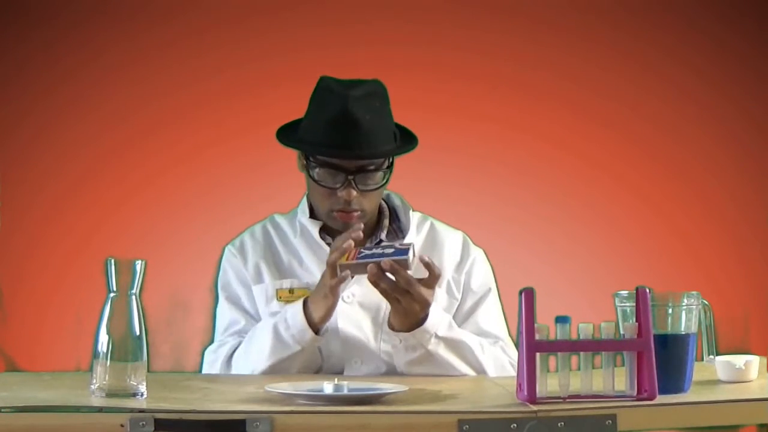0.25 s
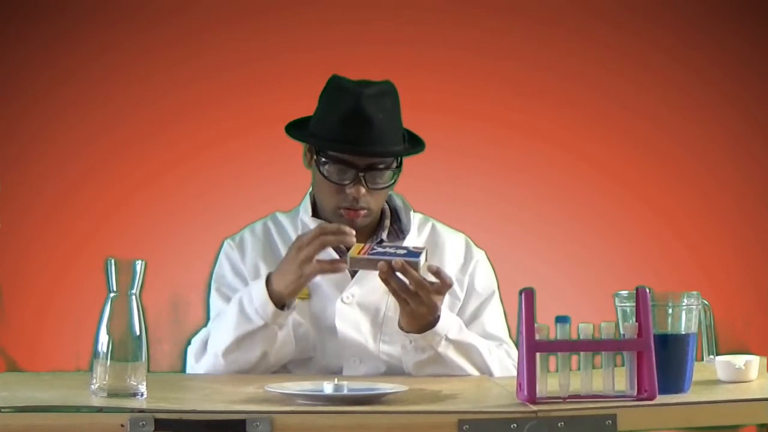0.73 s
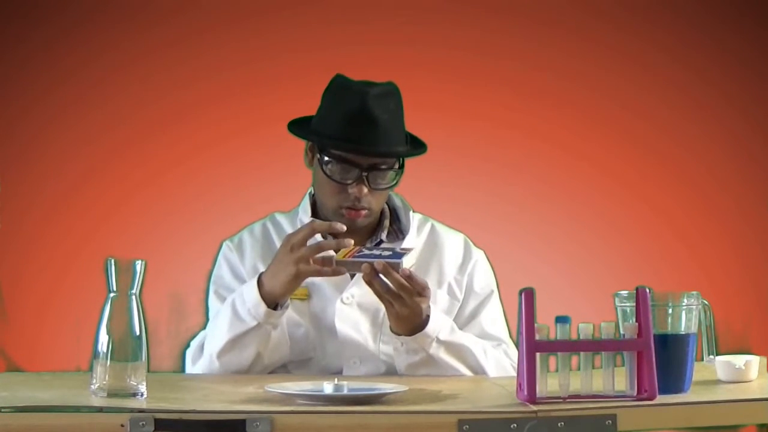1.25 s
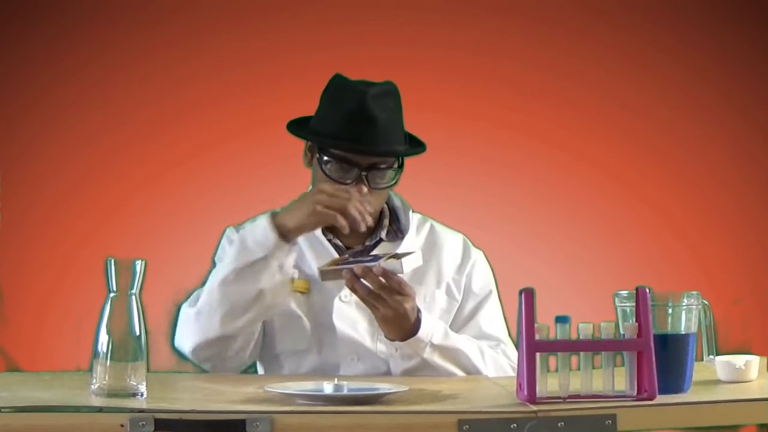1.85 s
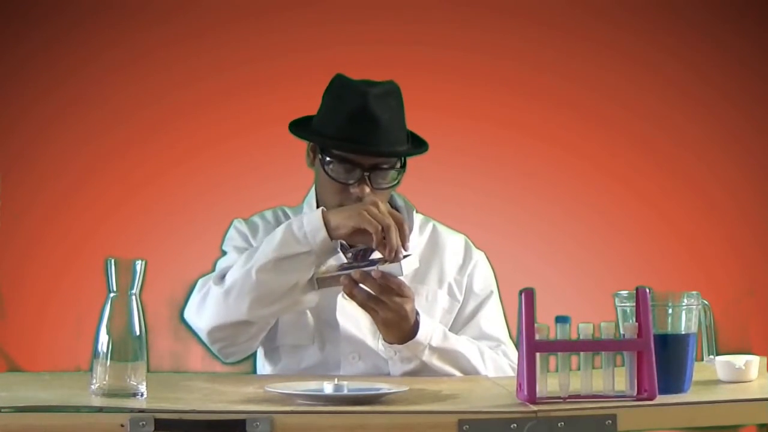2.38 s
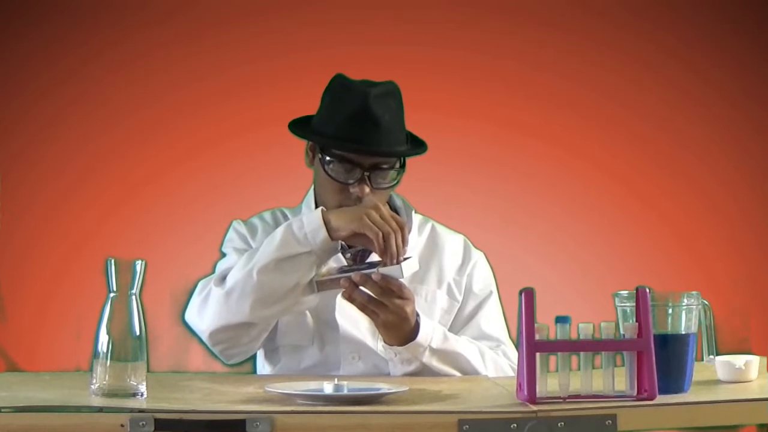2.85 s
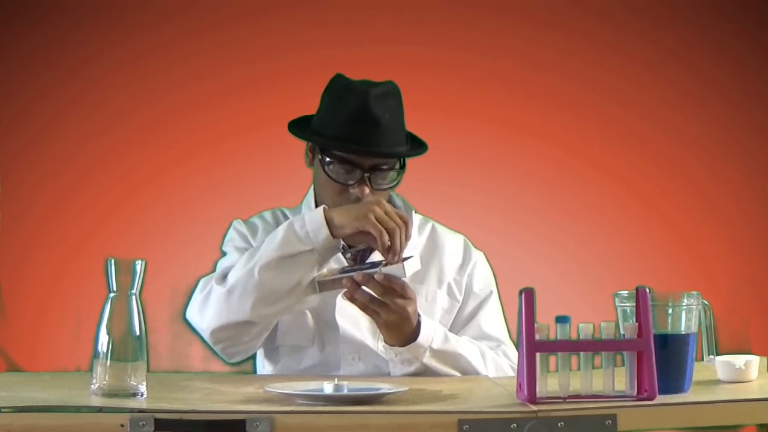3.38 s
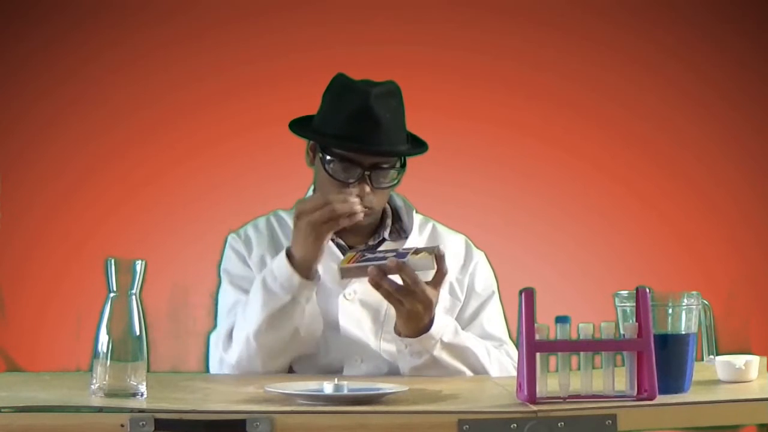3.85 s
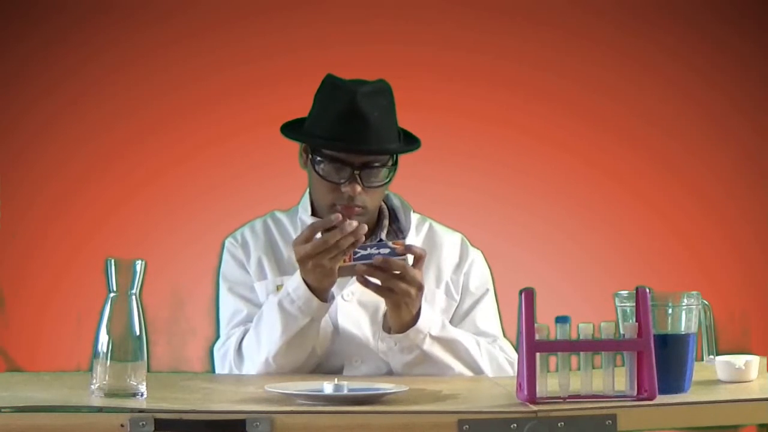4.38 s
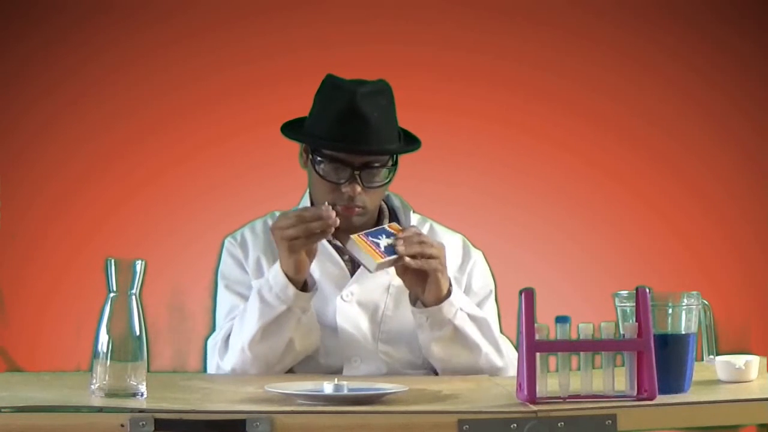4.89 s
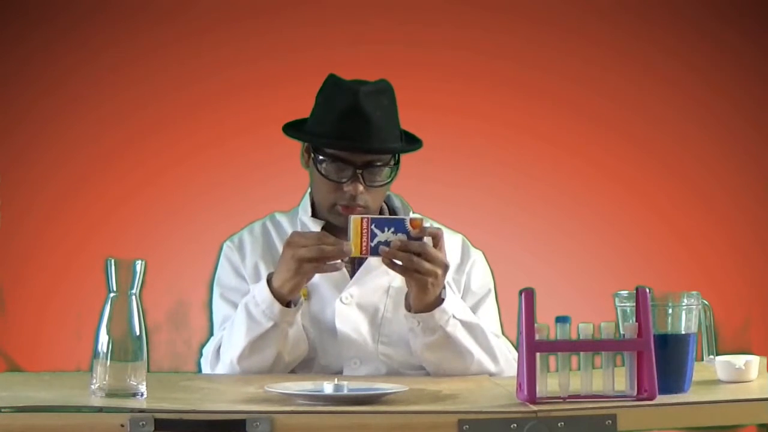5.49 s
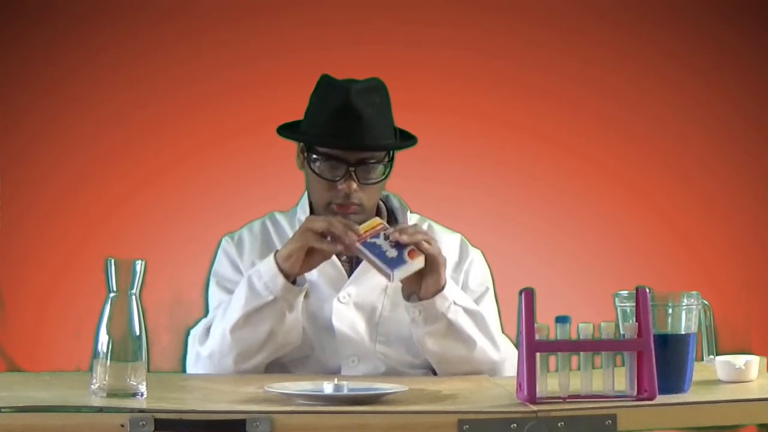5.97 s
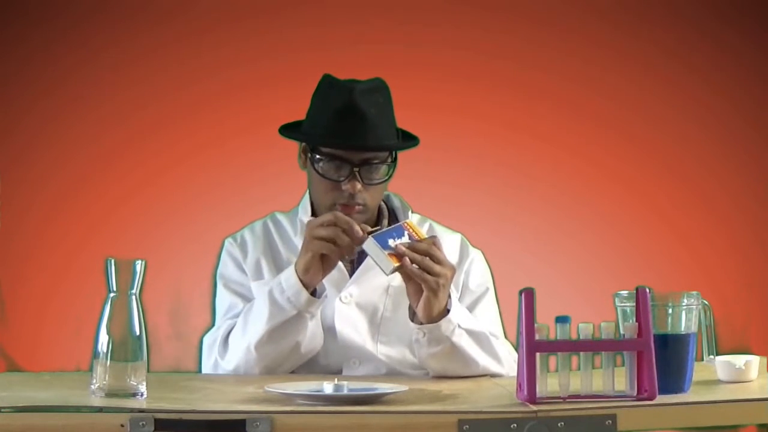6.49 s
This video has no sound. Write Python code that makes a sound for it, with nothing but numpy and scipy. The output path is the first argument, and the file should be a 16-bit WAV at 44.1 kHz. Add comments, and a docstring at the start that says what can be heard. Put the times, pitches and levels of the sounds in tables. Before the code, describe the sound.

A cardboard matchbox is handled a few metres from the microphone in a quiet, bare room, with short reflections and a faint, steady hush throughout. Soft papery rubs open the sound, with a sharp little tap at 0.3 seconds. After faint finger shifting, the tray scrapes in its sleeve around 1.5 seconds and stops with a light, hollow knock at 1.8. From about 2.3 to 3.5 seconds, wooden matches tick and rattle softly as fingers pick among them, with a stronger cluster of clicks near 3.3. Short scrapes at 3.8 and 4.1 seconds lead to a louder slide and clack at 4.3 as the tray shuts. Light taps, rubs and small rattles follow between 5.3 and 5.8 seconds as the box is turned. A few knocks and a firm, dry scrape come at about 6.1 to 6.3 seconds, then faint handling.

```python
"""Handling a matchbox.

A cardboard matchbox is handled a few metres away in a quiet, bare room. The tray slides in its sleeve
by stick and slip, fingers knock the box, and wooden matches tick against each other and rattle.
The table top and the walls answer strongly, over a steady hush."""
import sys
import numpy as np
from scipy import signal
from scipy.fft import rfft, irfft, next_fast_len
from scipy.io import wavfile
from scipy.ndimage import uniform_filter1d

SR = 44100
rng = np.random.default_rng(int(sys.argv[2]) if len(sys.argv) > 2 else 0)


def dump(signal):
    """Clip the signal to [-1, 1] and save it as 16-bit WAV at the path in sys.argv[1]."""
    limited = np.clip(np.atleast_2d(signal).T, -1, 1)
    pcm = np.round(limited * 32767).astype(np.int16)
    wavfile.write(sys.argv[1], SR, pcm)


N = 297053
TOP_HZ = 15850


def amp(db):
    """Decibels to gain."""
    return 10 ** (np.asarray(db) / 20)


def unit_rms(x):
    """Scale to rms 1."""
    return x / np.sqrt(np.mean(x ** 2) + 1e-20)


def log_interp(points, hz):
    """Interpolate (Hz, value) points on a log axis."""
    point_hz, values = np.transpose(points)
    return np.interp(np.log(hz + 1), np.log(point_hz + 1), values)


def curves(times_s, rows):
    """Interpolate each column to one value per sample."""
    return [np.interp(np.arange(N) / SR, times_s, column) for column in rows.T]


def filtered(x, response):
    """Apply a complex frequency response."""
    size = next_fast_len(x.shape[-1] + 8192)
    hz = np.fft.rfftfreq(size, 1 / SR)
    return irfft(rfft(x, size) * response(hz), size)[..., :x.shape[-1]]


def resonate(x, modes):
    """Parallel resonances of alternating sign."""
    return filtered(x, lambda f: sum((-1) ** k * amp(db) * 1j * f * bw / (hz * hz - f * f + 1j * f * bw)
                                     for k, (hz, bw, db) in enumerate(modes)))


def stereo(pair, correlation):
    """Mix two independent signals to a left-right correlation per frequency."""
    angle = lambda hz: np.arccos(np.clip(log_interp(correlation, hz), -1, 1)) / 2
    mid, side = filtered(pair, lambda hz: np.array([np.cos(angle(hz)), np.sin(angle(hz))]))
    return np.array([mid + side, mid - side])


def pings(start_s, db, hz, t60_s, samples):
    """Sum of damped sines, each swelling over about a cycle."""
    t = np.arange(samples) / SR
    cycles = hz[:, None] * t
    decay = amp(db[:, None] - 60 * t / np.reshape(t60_s, (-1, 1)))
    rings = decay * (1 - np.exp(-1.8 * cycles)) * np.sin(2 * np.pi * cycles)
    at = np.round(start_s * SR).astype(int)[:, None] + np.arange(samples)
    return np.bincount(at.ravel(), rings.ravel(), N + samples)[:N]


# Air and hiss. Each row: frequency in Hz, relative density in dB.
HUSH_SPECTRUM = [(12, -43), (25, -20), (50, 1), (80, -6.5), (133, -1.5), (200, -2), (400, -3.5), (700, -5),
                 (1300, -9.5), (2000, -13.5), (3200, -14), (6000, -18.5), (10000, -21.5), (13000, -21.5),
                 (15800, -25.5)]
# Each row: frequency in Hz, left-right correlation.
HUSH_CORRELATION = [(60, 1), (100, 0.91), (180, 0.86), (310, 0.47), (550, 0.18), (950, 0.02), (1650, 0.052),
                    (2860, 0.13), (4970, 0.54), (8640, 1), (15000, 1)]


def hush(level_db=-57, patch_db=0.99):
    """Steady room air and hiss, slightly patchy in time and frequency."""
    bins = signal.stft(rng.standard_normal((2, N + 512)), nperseg=512)[2]
    patches = uniform_filter1d(rng.standard_normal(bins.shape[1:]), 6, axis=0)
    patches = unit_rms(uniform_filter1d(patches, 14, axis=1))
    noise = signal.istft(bins * amp(patch_db * patches), nperseg=512)[1][:, :N]
    air = filtered(noise, lambda hz: amp(log_interp(HUSH_SPECTRUM, hz)))
    return amp(level_db) * unit_rms(stereo(air, HUSH_CORRELATION))


# Each row: time in seconds, body level in dB, treble level in dB.
FINGER_SHIFTS = [(0, -65, -67.5), (.6, -69, -67), (.86, -74, -72.5), (1.2, -69.5, -72.5), (1.95, -69, -68),
                 (2.2, -71.5, -71.5), (2.86, -65.5, -68), (3.1, -68, -69.5), (3.6, -66, -70),
                 (3.75, -72.5, -68.5), (4.07, -67, -65.5), (4.7, -62.5, -62), (5.04, -72, -71.5),
                 (5.27, -78, -72), (5.75, -64, -66.5), (6.06, -70, -69.5), (6.5, -58.5, -68.5),
                 (6.74, -66.5, -68)]


def fidget(edge_offset_db=-3):
    """Body, edge and paper gains of fingers shifting faintly on the box."""
    rows = np.array(FINGER_SHIFTS)
    body_db, treble_db = curves(rows[:, 0], rows[:, 1:])
    return amp([body_db, treble_db + edge_offset_db, treble_db])


# Each row: end of attack in seconds, hold in seconds, body, edge and paper drive in dB, hollow note in Hz,
# its share in dB, rim note in Hz, paper note in Hz, share of these two in dB.
PUSHES = [(0.002, 0.1, -49, -54, -51.5, 1130, -6.5, 3740, 8900, -3.5),
          (0.234, 0.045, -49.5, -55.5, -50.5, 1620, -5.5, 4030, 8800, -3.5),
          (0.32, 0.028, -52, -59, -59, 990, -2.5, 4340, 8800, -7),
          (0.49, 0.013, -65, -71, -63, 856, -7, 4000, 9100, -6),
          (0.62, .03, -69.5, -74, -75, 1470, -9, 3800, 9200, -14.5),
          (0.88, 0.018, -67, -77, -68, 1070, -7, 3600, 9300, -6),
          (0.985, 0.042, -69, -77, -61, 1100, -5, 3530, 9400, -5),
          (1.167, 0.0089, -85, -71, -70, 1160, -6.5, 3500, 9000, -7),
          (1.387, 0.11, -60.5, -60.5, -56.5, 1080, -6, 2240, 6900, -9),
          (1.515, 0.074, -48.5, -51, -53.5, 1100, -4, 2090, 6800, -1),
          (1.67, 0.049, -57, -58, -54.5, 1170, -11.5, 2950, 9300, -9),
          (1.784, 0.0045, -51, -55.5, -56, 1450, -10, 2600, 8000, -13),
          (1.827, 0.0082, -48.5, -51, -53.5, 1550, -4.5, 2520, 7500, -22),
          (1.872, 0.0046, -74, -68, -81, 1160, -7.5, 2640, 7800, -24),
          (2.335, 0.065, -66, -65, -74, 1660, -10, 2880, 10300, -16),
          (2.483, 0.074, -60, -70, -65.5, 700, -7.5, 2960, 11100, -28),
          (2.558, .005, -61, -64, -67, 720, -9, 3100, 11000, -20),
          (2.607, 0.017, -50.5, -53.5, -58, 720, -15.5, 3270, 10900, -19),
          (2.707, 0.1, -60.5, -66, -67, 1040, -11, 3860, 10600, -26),
          (2.937, 0.043, -49, -57, -62, 1170, -11.5, 4930, 10100, -15),
          (3.144, 0.078, -54, -57.5, -62.5, 1110, -8, 4300, 8500, -26),
          (3.366, 0.025, -47, -52, -53.5, 1180, -1.5, 3500, 6600, -3.5),
          (3.474, 0.054, -63.5, -64, -69, 1140, -1.5, 3400, 6600, -18),
          (3.782, 0.023, -76, -77, -62, 1380, -4, 3000, 8500, -19),
          (3.838, 0.0054, -49.5, -48.5, -53.5, 1770, -4.5, 2760, 6450, -7),
          (4.144, 0.027, -46.5, -47.5, -54.5, 1610, -6.5, 2350, 7500, -23),
          (4.235, 0.027, -48.5, -58, -46, 1630, -4.5, 2370, 9100, -12),
          (4.288, 0.011, -34.5, -36.5, -42.5, 1560, -6.5, 3300, 8650, -6.5),
          (4.472, 0.032, -61, -76, -68, 1480, -5.5, 3500, 9000, -2),
          (4.594, 0.015, -66, -64, -60.5, 1410, -5.5, 3740, 9400, -8),
          (4.786, 0.024, -53.5, -81, -66, 754, -6.5, 3580, 8800, -6),
          (5.297, 0.009, -66, -71, -78, 1510, -11, 3120, 8140, -9),
          (5.428, 0.06, -63, -58, -63.5, 1500, -7, 3050, 7900, -13),
          (5.5, 0.0088, -45, -53, -59, 1490, -15, 3100, 7550, -9.5),
          (5.613, 0.022, -49, -62, -68, 1600, -11, 3130, 7500, -11.5),
          (5.79, .02, -79, -71, -67, 850, -17, 3240, 7400, -8),
          (5.9, 0.034, -73, -73, -65.5, 1010, -6.5, 3300, 9000, -8),
          (5.955, 0.0065, -63, -69, -74, 1160, -5, 3500, 7550, -10),
          (6.098, .01, -56.5, -75, -60, 1110, -5.5, 3600, 7500, -8),
          (6.14, 0.013, -52, -50.5, -54, 1040, -6, 3680, 7400, -12),
          (6.188, 0.0037, -43, -55, -57, 1150, -9.5, 3700, 7400, -21),
          (6.275, 0.059, -37.5, -45, -50, 1200, -6.5, 2250, 6250, -8.5)]


def rubs(attack_db_per_s=440, release_db_per_s=186.5):
    """Short pushes: body, edge and paper gains, and note curves that shift with tray and grip."""
    rows = np.array(PUSHES)
    gains = np.zeros((3, N))
    for full_s, hold_s, *drive_db in rows[:, :5]:
        at = np.arange(max(round((full_s - 0.25) * SR), 0), min(round((full_s + hold_s + 0.5) * SR), N))
        t = at / SR - full_s
        loss_db = attack_db_per_s * np.maximum(-t, 0) + release_db_per_s * np.maximum(t - hold_s, 0)
        gains[:, at] += amp(np.array(drive_db)[:, None] - loss_db)
    middle_s = rows[:, 0] + rows[:, 1] / 2
    return gains, curves(middle_s, rows[:, 5:])


def slips(count, scatter_db):
    """Random stick-slip times and levels, a few much stronger than the rest."""
    start_s = rng.uniform(0, N / SR, count)
    return start_s, scatter_db * np.minimum(rng.exponential(size=count), 4)


def slip_note(centre_hz, count, detune, t60_cycles):
    """Dense slips, each ringing near a moving pitch."""
    start_s, db = slips(count, scatter_db=1.5)
    hz = centre_hz[(start_s * SR).astype(int)] * np.exp(detune * rng.standard_normal(count))
    samples = round(1.1 * t60_cycles * SR / centre_hz.min())
    return unit_rms(pings(start_s, db, np.minimum(hz, TOP_HZ), t60_cycles / hz, samples))


# Box walls and tray rim. Each row: frequency in Hz, bandwidth in Hz, relative gain in dB.
WALL_MODES = [(834, 234, -4.5), (1006, 45, 3), (1122, 103, 0), (1628, 225, 3), (2026, 320, -2)]
RIM_MODES = [(2260, 800, -1.5), (3730, 1450, 5.5), (4840, 1940, -4.5)]
# Paper fibres. Each row: frequency in Hz, relative density in dB.
RASP_SPECTRUM = [(4000, -4.5), (5500, -2.5), (6600, 0), (7800, -0.5), (9200, 1.5), (11500, -5),
                 (15000, -20.5)]


def sliding(knock_rattle, tick_rattle):
    """Card on card: slips ring hollow, walls and rim, and fibres rasp. Rattles drive the same sounds."""
    rub_gains, (hollow_hz, hollow_db, rim_hz, paper_hz, note_db) = rubs()
    body_gain, edge_gain, paper_gain = fidget() + rub_gains
    hollow = amp(hollow_db) * slip_note(hollow_hz, count=6000, detune=0.071, t60_cycles=7.4)
    rim_note = amp(note_db) * slip_note(rim_hz, count=9000, detune=0.032, t60_cycles=11.6)
    paper_note = amp(note_db - 3.5) * slip_note(paper_hz, count=14000, detune=0.073, t60_cycles=22)
    start_s, db = slips(count=30000, scatter_db=2.5)
    friction = np.bincount((start_s * SR).astype(int), amp(db) * rng.standard_normal(len(db)), N)[:N]
    walls = resonate(friction, WALL_MODES)
    rim = resonate(friction, RIM_MODES)
    rasp = filtered(friction, lambda hz: amp(log_interp([(1500, -14)] + RASP_SPECTRUM, hz)))
    body = (body_gain + knock_rattle) * (amp(-5.5) * unit_rms(walls) + hollow)
    edges = (edge_gain + amp(5.5) * tick_rattle) * (amp(-3.5) * unit_rms(rim) + rim_note)
    paper = (paper_gain + amp(7) * tick_rattle) * (amp(-3) * unit_rms(rasp) + paper_note)
    return body + edges + paper


def rattle(start_s, db, t60_s, rise_s=0.0014):
    """Envelope that rises after each contact and dies as the loose matches settle."""
    jolts = np.bincount(np.round(start_s * SR).astype(int), amp(db), N)
    t = np.arange(SR // 4) / SR
    settling = amp(-60 * t / t60_s) * (1 - np.exp(-t / rise_s))
    return signal.fftconvolve(jolts, settling)[:N]


# Each row: start in seconds, level in dB, pitch in Hz, T60 in seconds, relative rattle drive in dB.
FINGER_KNOCKS = [(0.295, -17, 950, 0.0052, -18.5), (0.496, -39.5, 790, 0.01, -15),
                 (0.6, -45, 1530, 0.026, -11), (0.871, -40, 1050, 0.0089, -13),
                 (1.215, -38, 1120, 0.0073, -10), (1.376, -41.5, 1080, 0.0088, -9.5),
                 (1.524, -35, 2240, 0.016, -20), (1.791, -25.5, 1540, 0.0086, -11.5),
                 (2.325, -37.5, 1650, 0.0065, -13), (2.569, -34, 960, 0.0089, -11),
                 (2.688, -36.5, 910, 0.007, -5.5), (2.931, -41, 1160, 0.012, -11),
                 (3.144, -36, 1040, 0.011, -9), (3.288, -38, 1040, 0.0061, -2),
                 (3.326, -27, 1080, 0.012, -14), (3.357, -19, 1140, 0.022, -18),
                 (3.828, -34.5, 1600, 0.0051, -12), (4.138, -35, 2340, 0.02, -7),
                 (4.272, -29, 1620, 0.03, -11), (4.29, -28, 3530, 0.025, -33),
                 (4.293, -23, 1627, 0.055, -37), (4.787, -40, 900, 0.0065, -12),
                 (5.278, -41, 1520, 0.0085, -14), (5.371, -33.5, 1700, 0.0038, -7.5),
                 (5.435, -29, 920, 0.011, -16), (5.485, -33.5, 1630, 0.017, -3.5),
                 (5.612, -28, 1000, 0.0085, -16), (5.778, -35, 850, 0.0093, -27),
                 (5.966, -41.5, 1120, 0.015, -29), (6.096, -47, 1760, 0.013, -16),
                 (6.146, -28, 940, 0.0064, -14), (6.179, -27, 770, 0.017, -18),
                 (6.312, -28.5, 819, 0.056, -31)]


def knocks():
    """A finger rings one short note of the box. Returns sound and rattle envelope."""
    start_s, db, hz, t60_s, rattle_db = np.transpose(FINGER_KNOCKS)
    return pings(start_s, db, hz, t60_s, samples=1500), rattle(start_s, db + rattle_db, t60_s=0.078)


# Each row: start in seconds, level in dB, low mode in Hz, high mode in Hz, relative high-mode level in dB,
# relative rattle drive in dB.
MATCH_TICKS = [(0.295, -27.5, 4770, 9400, -15, -33), (.597, -48, 3850, 9000, 4, -27),
               (1.792, -31, 5000, 9300, -6, -15.5), (2.3252, -45.5, 3840, 12300, -4, -14.5),
               (2.485, -47.5, 7550, 12100, 7, -17), (2.5676, -32.5, 5100, 11000, 4, -14),
               (2.687, -36, 5910, 8500, -5, -13.5), (2.707, -27, 6000, 8360, -4, -20),
               (2.742, -58, 3400, 13000, 7, -20), (2.772, -48, 3240, 11200, 9, -10),
               (2.908, -42, 6800, 10100, 1, -11), (2.913, -52, 4430, 13200, 8, -28),
               (2.968, -37, 5030, 8850, -5, -13), (3.145, -34.5, 5030, 8150, -0.5, -14.5),
               (3.2917, -30, 4840, 7360, -20, -16), (3.3225, -31.5, 4950, 10800, 3, -13.5),
               (3.325, -26, 4800, 6840, -1.5, -22), (3.502, -45, 5000, 7300, 3.5, -26),
               (3.839, -34, 4370, 9100, -6, -33), (4.149, -26, 3950, 6600, -7, -29),
               (4.282, -25.5, 3260, 9200, -3, -13.5), (4.29, -25, 5170, 6860, 1, -42),
               (5.278, -40, 3120, 4800, -7, -26), (5.373, -34, 3270, 8850, -11, -22.5),
               (5.484, -37.5, 3500, 6660, 0, -24), (5.613, -40.5, 3000, 6900, 2, -16.5),
               (6.12, -42, 4200, 8900, -10, -12), (6.15, -32, 3930, 7600, 3, -15.5),
               (6.271, -32.5, 6250, 10000, -10, -13.5)]


def ticks():
    """Match on match rings two bending modes. Returns sound and rattle envelope."""
    start_s, db, low_hz, high_hz, high_db, rattle_db = np.transpose(MATCH_TICKS)
    low = pings(start_s, db, low_hz, t60_s=0.0035, samples=400)
    high = pings(start_s, db + high_db, high_hz, t60_s=0.0047, samples=400)
    return low + high, rattle(start_s, db + rattle_db, t60_s=0.053)


# Each row: start in seconds, level in dB, pitch in Hz, T60 in seconds.
TRAY_THUDS = [(0.295, -31, 560, 0.0048), (1.790, -26.5, 440, 0.014), (1.796, -23, 250, 0.014),
              (1.812, -26.5, 375, 0.014), (2.57, -44, 625, 0.014), (3.33, -36, 354, 0.015),
              (4.272, -26.5, 755, 0.018), (4.288, -25.5, 480, 0.012), (4.3, -26.5, 264, 0.018),
              (4.79, -35, 620, 0.0088), (5.5, -28, 420, 0.0064), (6.309, -38, 395, 0.0066)]


def thuds():
    """The tray hits its stop or the palm and rings one low note."""
    return pings(*np.transpose(TRAY_THUDS), samples=2000)


# Room decay. Each row: frequency in Hz, T60 in seconds.
ROOM_T60 = [(200, 0.73), (450, 0.45), (1200, 0.4), (3600, 0.48), (6000, 0.4), (9000, 0.16), (14000, 0.42)]
# Each row: frequency in Hz, left-right correlation.
TAIL_CORRELATION = [(60, 1), (180, 0.89), (500, 0.99), (1000, 0.71), (1700, 0.45), (3000, 0.45),
                    (5000, 0.57), (8000, 0.14), (10000, 0.95), (11500, 1)]
# Table top and near walls. Each row: delay in seconds, gain in dB.
EARLY_ECHOES = [(.0052, -1.5), (.0108, -5), (.028, -7), (.034, -8), (.043, -8)]


def reflections(t, build_s=0.02, sway_s=0.00025):
    """One random stereo response: early echoes and a tail that builds, then dies slowest in the bass."""
    hz, frame_s, bins = signal.stft(rng.standard_normal((2, len(t))), SR, nperseg=256)
    decay = amp(-60 * frame_s / log_interp(ROOM_T60, hz)[:, None])
    tail = signal.istft(bins * decay, SR, nperseg=256)[1][:, :len(t)]
    onset = np.clip(t / build_s - 0.2, 0, 1)
    response = stereo(tail * onset, TAIL_CORRELATION)
    response *= amp(2) / np.linalg.norm(response[0])
    for delay_s, db in EARLY_ECHOES:
        response[:, round((delay_s + rng.normal(0, sway_s)) * SR)] += amp(db)
    return response


# Modes between the walls. Each row: frequency in Hz, energy relative to the direct sound in dB.
STANDING_WAVES = [(766, -30.5), (843, -27.5), (1005, -28), (1124, -40), (1208, -36), (1276, -27.5),
                  (1509, -29.5), (1595, -34), (1710, -29), (2083, -28), (2440, -34), (3605, -27),
                  (9280, -32)]


def room(x, response_samples=21000):
    """Direct sound and standing waves stay; echoes and tail change as the hands move the box."""
    t = np.arange(response_samples) / SR
    steady = np.zeros(response_samples)
    for hz, db in STANDING_WAVES:
        wave = amp(-60 * t / log_interp(ROOM_T60, hz)) * np.sin(2 * np.pi * hz * t)
        steady += amp(db) * wave / np.linalg.norm(wave)
    steady[0] += 1  # direct sound
    hop = SR // 12
    window = np.sin(np.pi * np.arange(2 * hop) / (2 * hop)) ** 2
    padded = np.pad(x, (hop, 2 * hop))
    moving = np.zeros((2, N + SR + response_samples))
    for at in range(0, N + hop, hop):
        frame = window * padded[at:at + 2 * hop]
        wet = signal.fftconvolve(frame[None], reflections(t), axes=1)
        moving[:, at:at + wet.shape[1]] += wet
    return signal.fftconvolve(x, steady)[:N] + moving[:, hop:hop + N]


def scene(corner_hz=220):
    """The box in the room over the hush; a thing this small radiates almost no bass."""
    knock_sound, knock_rattle = knocks()
    tick_sound, tick_rattle = ticks()
    box = sliding(knock_rattle, tick_rattle) + knock_sound + tick_sound + thuds()
    radiated = filtered(box, lambda hz: (1j * hz / (corner_hz + 1j * hz)) ** 3)
    return room(radiated) + hush()


def record(dry):
    """Brick-wall low-pass at TOP_HZ."""
    return filtered(dry, lambda hz: hz < TOP_HZ)


dry = scene()
out = record(dry)
dump(out)
```